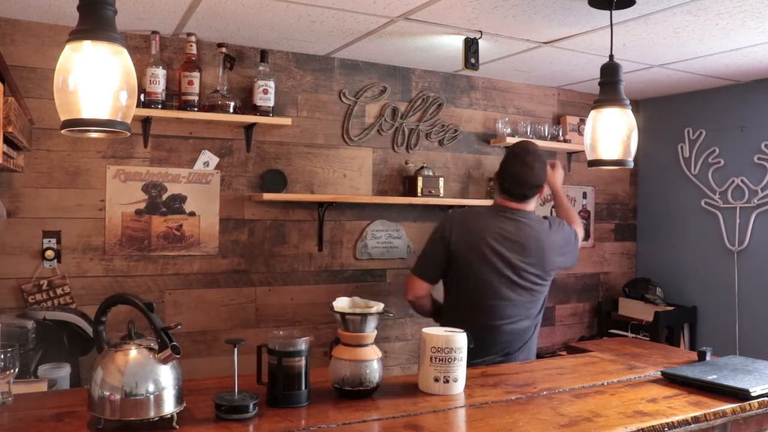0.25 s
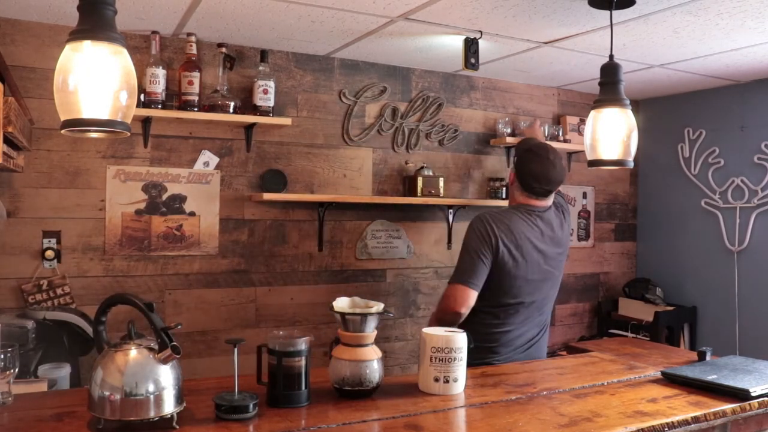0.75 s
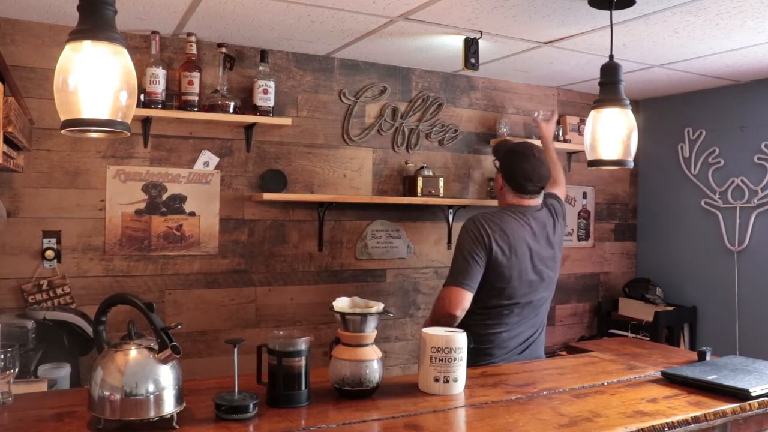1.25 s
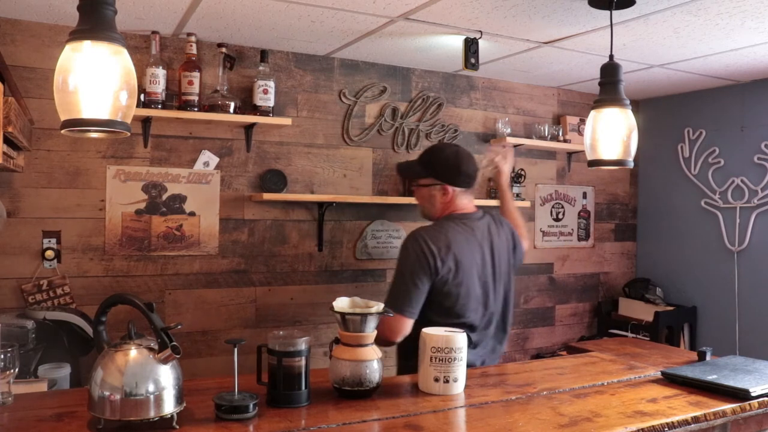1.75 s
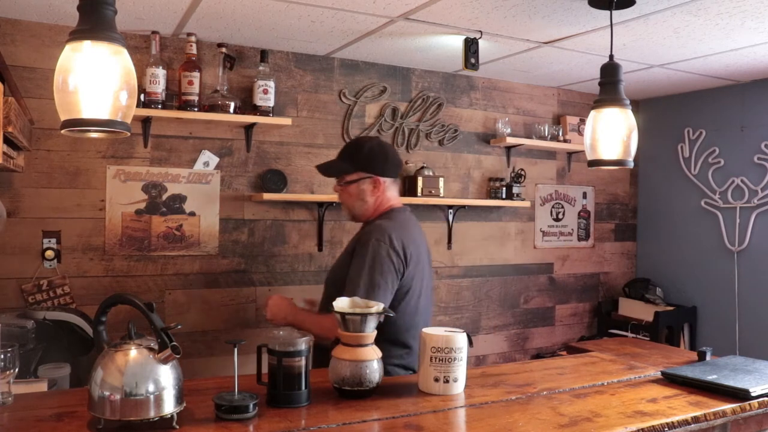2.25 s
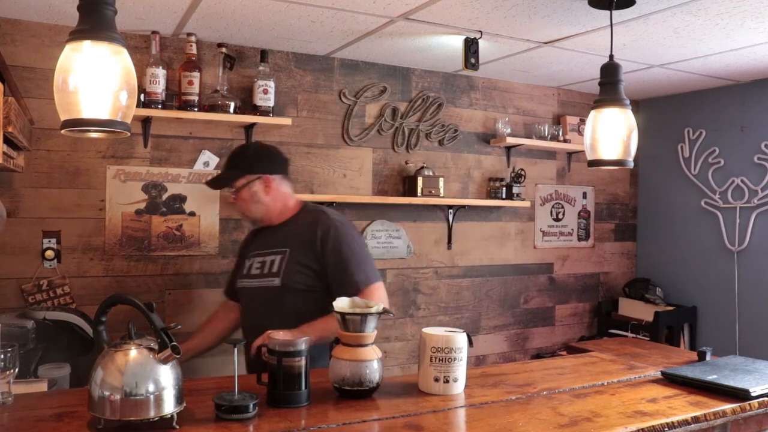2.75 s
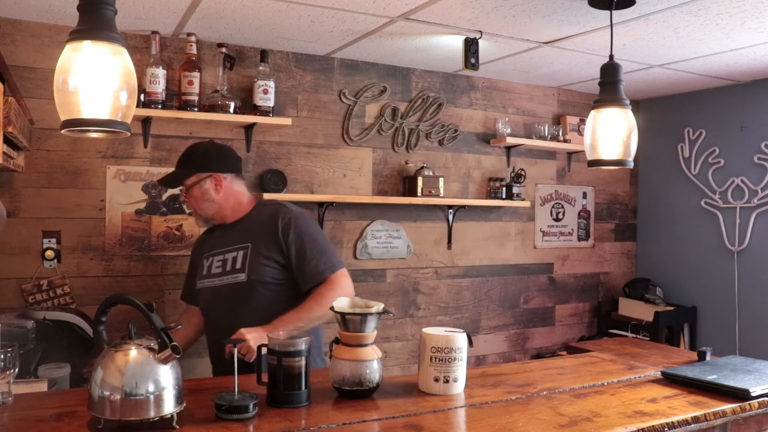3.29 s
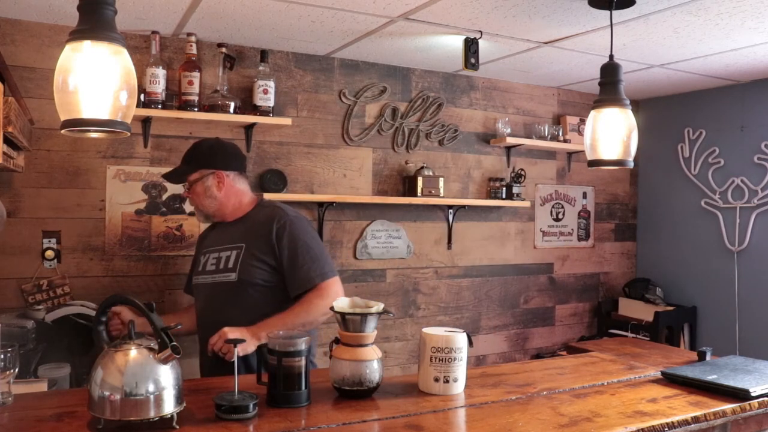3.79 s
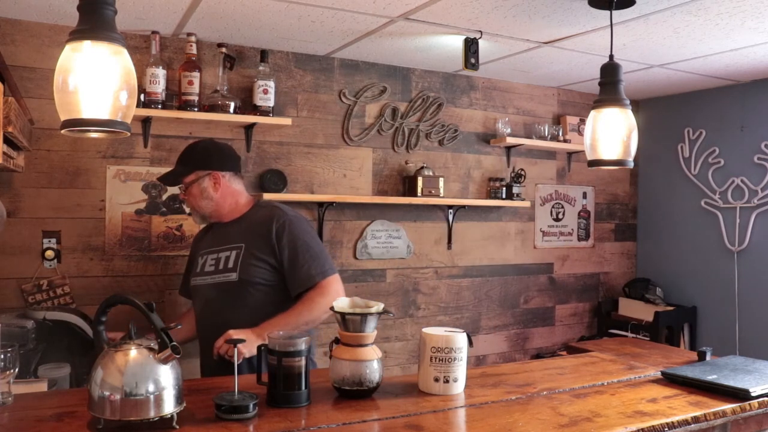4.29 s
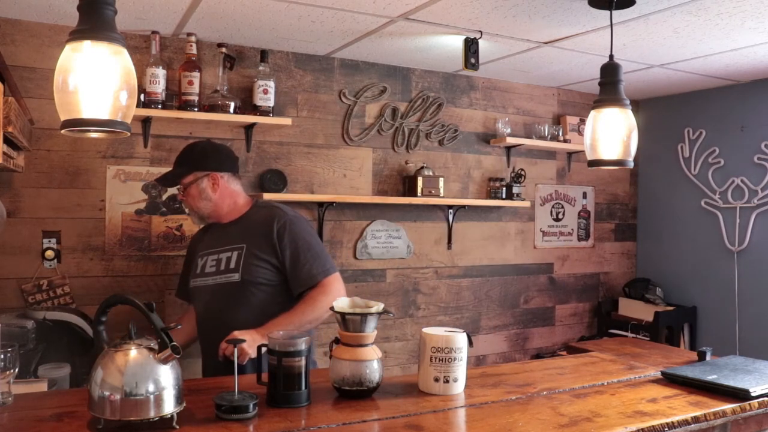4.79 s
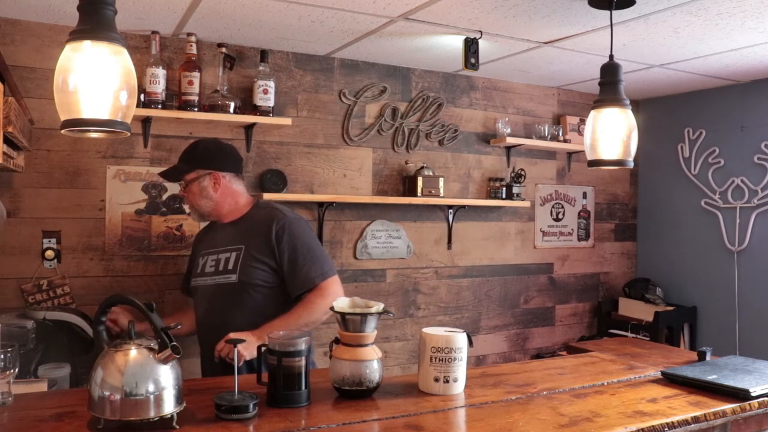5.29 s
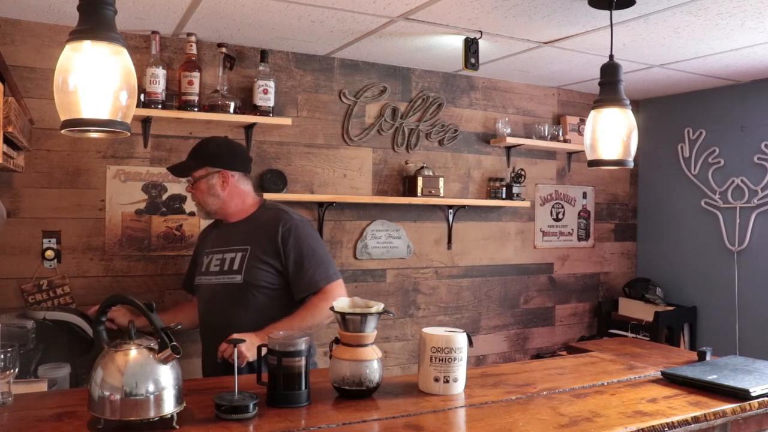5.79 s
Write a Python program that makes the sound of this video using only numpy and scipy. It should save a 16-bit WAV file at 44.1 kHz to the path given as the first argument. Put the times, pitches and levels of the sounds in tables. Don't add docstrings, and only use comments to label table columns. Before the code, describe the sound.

Over faint hum and hiss, a person shuffles, clothing rustling with light ticks and tiny pings. Around halfway a loud plastic latch clack breaks in, then loose parts rattle and slide, the lid slams, more small clicks follow, and a hollow thump rings the brewer base. Soft knocks on the wooden counter end it. Small damped room, microphone some metres away.

```python
import sys
import numpy as np
from scipy import signal
from scipy.fft import rfft, irfft
from scipy.io import wavfile

SR = 44100
rng = np.random.default_rng(int(sys.argv[2]) if len(sys.argv) > 2 else 0)


def rack_gain(trim_db):
    fader = np.asarray(trim_db, float)
    return 10 ** (fader / 20)


def put_to_file(sound):
    columns = np.atleast_2d(sound).T
    safe = np.clip(columns, -1, 1)
    whole_steps = np.round(safe * 32767)
    wavfile.write(sys.argv[1], SR, whole_steps.astype(np.int16))


N = 266496
TOP_HZ = 15830


def band(x, lo_hz, hi_hz):
    edges_hz = [lo_hz, min(hi_hz, 0.45 * SR)]
    return signal.sosfilt(signal.butter(2, edges_hz, "bandpass", fs=SR, output="sos"), x)


def unit(x, peak=False):
    return x / (np.abs(x).max() if peak else np.sqrt(np.mean(x ** 2)))


def add(track, s, x):
    i = int(s * SR)
    track[i:i + len(x)] += x[:N - i]


def contact(ms, rise_ms, size=9000):
    t_ms = np.arange(size) / SR * 1000
    rise = 1 - np.exp(-(t_ms / rise_ms) ** 2)
    return rng.standard_normal(size) * np.exp(-t_ms / ms) * rise


def strike(modes, rise_ms, cycles=0.86, size=9000):
    hz, width_hz, db = np.transpose(modes)[:, :, None]
    t = np.arange(size) / SR
    phase = 2 * np.pi * rng.random(hz.shape)
    waves = rack_gain(db) * np.exp(-np.pi * width_hz * t) * np.sin(2 * np.pi * hz * t + phase)
    rise_s = rise_ms / 1000 + cycles / hz
    build_up = 1 - np.exp(-(t / rise_s) ** 2)
    return unit(np.sum(waves * build_up, axis=0), True)


def ring(x, modes):
    out = 0
    for k, (hz, width_hz, db) in enumerate(modes):
        r = np.exp(-np.pi * width_hz / SR)
        poles = [1, -2 * r * np.cos(2 * np.pi * hz / SR), r * r]
        sign = (-1) ** k
        out = out + sign * rack_gain(db) * signal.lfilter([1 - r * r, 0, r * r - 1], poles, x)
    return out


def contacts(table, octaves, edge_hz, ms, growth):
    out = np.zeros(N)
    for s, db, hz, crack_db in table:
        length_ms = ms * rack_gain(growth * (-45.5 - max(db, crack_db)))
        force = contact(length_ms, 0.31 * length_ms)
        body = unit(band(force, hz / 2 ** octaves, hz * 2 ** octaves), True)
        crack = unit(band(force, edge_hz, 8740), True)
        add(out, s - 0.001, rack_gain(db) * body + rack_gain(crack_db) * crack)
    return out


def mode_pairs(table, width_hz, loss, rise_ms, rise_cycles):
    out = np.zeros(N)
    for s, db, hz in table:
        wide_hz = width_hz + loss * hz
        pair = [(hz, wide_hz, 0), (hz * 1.079, wide_hz * 0.92, -7)]
        add(out, s - 0.001, rack_gain(db - 1.0) * strike(pair, rise_ms + 1000 * rise_cycles / hz))
    return out


def grains(rate, scatter_db):
    chance = rng.random((3, N))
    slips = chance[0] < rate / SR
    size = rack_gain(-scatter_db * np.log(chance[1] + 0.032))
    return slips * size * np.sign(chance[2] - 0.5)


def strokes(table, rise_s, fade_db_s):
    t = np.arange(N) / SR
    s, db, hold_s, bright_db = np.transpose(table)[:, :, None]
    rise_db = 30 * np.maximum(s - t, 0) / rise_s
    fade_db = fade_db_s * np.maximum(t - s - hold_s, 0)
    gain = rack_gain(db - rise_db - fade_db)
    dull = np.sqrt(np.sum(gain ** 2, axis=0))
    bright = np.sqrt(np.sum((gain * rack_gain(bright_db)) ** 2, axis=0))
    return dull, bright


def coloured(points, db):
    hz = np.fft.rfftfreq(N, 1 / SR) + 1
    table = np.array(points)
    shape = rack_gain(np.interp(np.log(hz), np.log(table[:, 0]), table[:, 1]))
    spectrum = rfft(rng.standard_normal(N)) * shape * (hz < TOP_HZ)
    return rack_gain(db) * unit(irfft(spectrum, N))


# (frequency [Hz], density [dB per Hz])
SHARED_NOISE = [(13, -22), (22, -10.5), (70, -2), (92, -5.5), (260, -10), (725, -13.5), (1260, -18),
                (15800, -26)]
# (frequency [Hz], density [dB per Hz])
APART_NOISE = [(13, -30), (22, -3), (151, -8.5), (178, -12), (317, -14), (1100, -21), (13000, -20.5),
               (15800, -22)]


def floor():
    mid = coloured(SHARED_NOISE, -64)
    side = coloured(APART_NOISE, -78)
    return np.array([mid + side, mid - side])


# (time [s], level [dB], hold [s], brightness [dB])
SHIFTS = [
    (0.02, -58, 0.025, -2),
    (.56, -67.5, 0.6, -14),
    (1.4, -66.5, 0.2, -12),
    (1.8, -65, 0.31, -4.5),
    (2.59, -58, .02, -4),
    (2.86, -62, 0.029, -4),
    (3.12, -65, .005, -10),
    (5.94, -72, .1, -18),
]
# (time [s], level [dB], hold [s], brightness [dB])
FLICKS = [
    (1.69, -49, 0.0014, 0),
    (1.76, -53, .003, -23),
    (2.44, -61, .003, -24),
    (5.72, -61, .003, -18),
]


def rustle():
    shifts = strokes(SHIFTS, rise_s=0.19, fade_db_s=78)
    flicks = strokes(FLICKS, rise_s=0.013, fade_db_s=800)
    level, bright = np.hypot(shifts, flicks)
    folds = grains(4000, 1.5)
    low = level * unit(band(folds, 176, 1660))
    high = bright * unit(band(folds, 2400, 5400))
    return rack_gain(-5.5) * (low + high)


# (frequency [Hz], T60 [s])
ROOM_T60 = [(400, 0.26), (1000, 0.22), (2500, 0.21), (6000, 0.14), (12000, 0.22)]
# (delay [ms], level [dB])
ECHOES = [(9.0, -17.5), (16.0, -12), (25.0, -28)]


def room(size=16000):
    t = np.arange(size) / SR
    noise = rng.standard_normal(size)
    tail = sum(band(noise, hz / 1.45, hz * 1.686) * 1000. ** (-t / t60) for hz, t60 in ROOM_T60)
    tail = tail * (1 - np.exp(-(t * 1000 / 5.1) ** 2))
    echoes = np.zeros(size)
    for ms, db in ECHOES:
        echoes[int(ms / 1000 * SR)] = rack_gain(db)
    out = rack_gain(-4) * tail / np.sqrt(np.sum(tail ** 2)) + band(echoes, 530, 3700)
    out[0] = 1
    return out


# (time [s], peak [dB], centre [Hz], crack [dB])
TICKS = [(.025, -48.5, 830, -52), (.05, -52, 2600, -62), (.1, -58, 2200, -60), (.28, -58.5, 2500, -62),
         (1.521, -54, 2550, -54.5), (1.681, -44, 3130, -49), (1.758, -35, 3280, -55),
         (1.763, -40.5, 3030, -56), (1.845, -51.5, 2800, -54.5), (1.875, -50, 2800, -53.5),
         (1.925, -50.5, 1350, -53), (1.987, -54, 3630, -44.5), (2.039, -45, 2180, -44),
         (2.582, -49.5, 2400, -62), (2.818, -56, 3830, -61), (2.91, -55.5, 2800, -64)]


def ticks():
    return contacts(TICKS, octaves=0.54, edge_hz=4200, ms=5.8, growth=1)


# (time [s], peak [dB], ring [Hz])
PINGS = [(.448, -56.5, 4200), (.578, -54.5, 6750), (.684, -45, 2250), (1.243, -56, 2330),
         (1.451, -57, 2380), (1.52, -53.5, 1260), (1.56, -55.5, 1330), (1.664, -56, 2120),
         (1.985, -54, 2150), (1.989, -52, 663), (2.3, -57, 2380), (2.433, -47, 817), (5.696, -48, 760),
         (5.697, -51, 1580), (5.824, -54.5, 1590), (5.879, -60, 1610), (6.029, -52, 883),
         (2.436, -54, 1390), (2.589, -52.5, 1760)]


def pings():
    return mode_pairs(PINGS, width_hz=75, loss=0.015, rise_ms=1.1, rise_cycles=0)


# (time [s], peak [dB], ring [Hz])
RATTLES = [(3.12, -52, 2400), (3.166, -27.5, 1164), (3.378, -55.5, 6540), (3.742, -41, 8030),
           (3.774, -33, 1480), (3.775, -40.5, 8100), (3.779, -39.5, 6200), (3.805, -51, 9150),
           (3.814, -36, 1470), (3.867, -44.5, 4210), (4.075, -44.5, 1566), (4.247, -42, 1500),
           (4.255, -45, 8700), (4.298, -31.5, 1587), (4.298, -42, 2400), (4.366, -54.5, 2230),
           (4.702, -42.5, 1680), (4.702, -52.5, 2250), (4.825, -36, 470), (4.827, -38, 890)]


def rattles():
    return mode_pairs(RATTLES, width_hz=70, loss=0.014, rise_ms=1.1, rise_cycles=0)


# (time [s], peak [dB], blur [dB], crack [dB], contact [ms])
BLOWS = [
    (3.1543, -14, -23, -39, 1.8),
    (4.1103, -21, -24.5, -28, 6.7),
    (4.809, -19, -32.5, -33.5, 12.2),
]
# (frequency [Hz], width [Hz], level [dB])
LATCH = [(144, 17.4, -33), (294, 53, -20), (410, 79, -17.5), (760, 138, -4.5), (883, 117, 6),
         (1247, 120, -10), (1654, 96, 2), (1910, 130, -5), (2250, 320, -62), (2620, 340, -18),
         (3200, 300, -13), (3645, 250, -4.5), (4430, 310, -8), (5600, 450, -16)]
LID = [(201, 32, -19), (293, 37, -23), (365.4, 17, -15), (600, 44, 2.5), (820, 45, 3.5), (920, 51, 7.5),
       (1185, 115, 9), (1470, 46, 2), (1590, 200, 2), (2014, 23, -3.5), (2400, 110, -15), (3040, 95, -21),
       (5130, 180, 7.5), (8550, 500, -19)]
BASE = [(110.4, 7.9, -23), (172, 15, -4.5), (237, 51, -3), (338.5, 22.6, -10.5), (411, 28, -9),
        (535, 27, -11), (760, 59, -6), (933, 25, -13), (1610, 165, -6.5), (2150, 27, -28), (2600, 80, -24),
        (2960, 120, -19), (3680, 8.9, -34), (5860, 500, 0)]


def blows():
    out = np.zeros(N)
    # modes, rise in ms, lowest frequency of the blur in Hz
    parts = ((LATCH, 3.4, 132), (LID, 1.06, 474), (BASE, 0.78, 133))
    for (s, db, blur_db, crack_db, ms), (modes, rise_ms, low_hz) in zip(BLOWS, parts):
        blur = unit(band(contact(ms * 1.73, rise_ms), low_hz, 3030), True)
        crack = unit(band(contact(ms, rise_ms / 2), 2000, 8140), True)
        add(out, s, rack_gain(db) * strike(modes, rise_ms) + rack_gain(blur_db) * blur + rack_gain(crack_db) * crack)
    return out


# (time [s], peak [dB], frequency [Hz])
SWAYS = [
    (3.17, -54.5, 36.8),
    (3.8, -55, 41.2),
    (4.13, -57, 45.6),
    (4.442, -55.5, 188),
]


def sways():
    return mode_pairs(SWAYS, width_hz=0, loss=0.16, rise_ms=0, rise_cycles=1.1)


# (time [s], peak [dB], centre [Hz], crack [dB])
PARTS = [(3.646, -44, 2480, -47.5), (3.686, -42, 1320, -47), (3.743, -36.5, 2100, -31),
         (3.757, -39, 1140, -41), (3.776, -32, 2790, -51), (3.790, -33.5, 600, -60),
         (3.806, -48, 1120, -59), (3.816, -39.5, 2190, -42), (3.845, -48, 600, -68),
         (4.104, -39, 1500, -41), (4.226, -42, 1770, -41), (4.248, -46, 1470, -46),
         (4.255, -51, 1940, -35.5), (4.297, -54, 2400, -35.5), (5.695, -47.5, 690, -48),
         (5.878, -54, 866, -68), (5.993, -56, 716, -70), (3.737, -59, 2500, -46), (4.062, -52, 600, -60),
         (4.074, -54, 3300, -51)]


def part_knocks():
    return contacts(PARTS, octaves=0.5, edge_hz=1800, ms=4.7, growth=0.014)


# (time [s], level [dB], hold [s], brightness [dB])
SLIDES = [
    (3.65, -54, 0.058, 0.5),
    (3.746, -42.5, 0.028, 1),
    (3.8, -42.5, 0.01, -0.5),
    (3.93, -62.5, 0.11, -3),
    (4.078, -49, .003, -2),
    (4.118, -36, 0.0047, -2),
    (4.235, -55.5, 0.047, 5),
    (4.298, -49.5, 0.0014, 3.5),
    (4.4, -72.5, 0.099, 2),
]
# (frequency [Hz], width [Hz], level [dB])
HOUSING = [(198, 144, 3.5), (398, 130, -2), (555, 98, 5.5), (893, 165, 1.5), (1500, 300, -1.5),
           (1824, 240, 0.5), (2400, 330, -7), (2930, 230, -10.5)]


def slides():
    level, bright = strokes(SLIDES, rise_s=0.0075, fade_db_s=344)
    slips = grains(2600, 3.7)
    housing = level * unit(ring(slips, HOUSING))
    scrape = rack_gain(-9.0) * bright * unit(band(slips, 3350, 5350))
    return rack_gain(-0.5) * (housing + scrape)


# (time [s], peak [dB])
THUDS = [(4.145, -41), (4.159, -44.5), (3.684, -42.5), (3.749, -36.5), (3.757, -45), (3.79, -48),
         (3.807, -43), (3.846, -69), (4.226, -57), (4.247, -63), (4.301, -46.5), (5.693, -50),
         (5.765, -55.5), (5.877, -49.5), (5.992, -51)]
# (frequency [Hz], width [Hz], level [dB])
COUNTER = [(184.8, 41, 6), (247.5, 51, -2), (382, 46, -18.5), (376, 61, -4)]


def thuds():
    out = np.zeros(N)
    for s, db in THUDS:
        add(out, s - 0.001, rack_gain(db) * strike(COUNTER, rise_ms=4.6))
    return out


def scene():
    person = rustle() + ticks() + pings()
    brewer = rattles() + blows() + part_knocks() + slides()
    counter = sways() + thuds()
    near = person + brewer + counter
    return signal.fftconvolve(near, room())[:N] + floor()


def top_cut(x):
    return signal.sosfilt(signal.butter(12, 16430, fs=SR, output="sos"), x)


def record(dry):
    low_pass = signal.ellip(8, 0.2, 70, TOP_HZ, fs=SR, output="sos")
    mix = signal.sosfilt(low_pass, dry)
    return top_cut(mix)


dry = scene()
out = record(dry)
put_to_file(out)
```